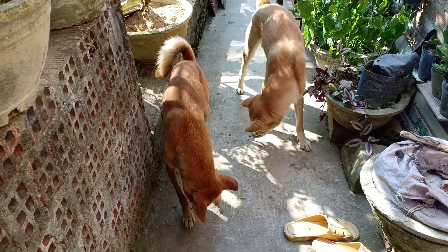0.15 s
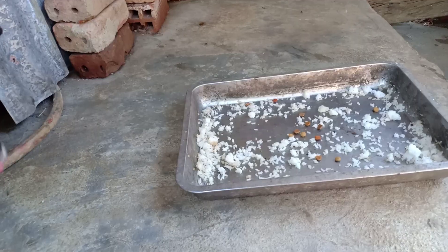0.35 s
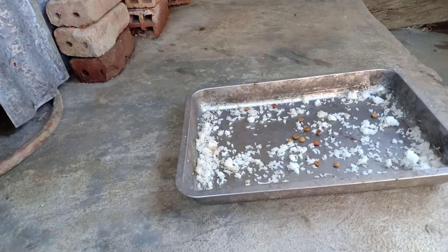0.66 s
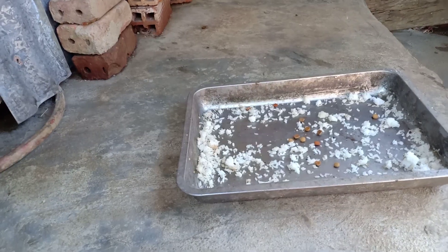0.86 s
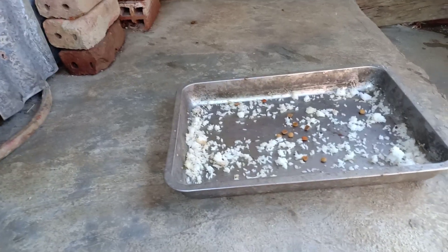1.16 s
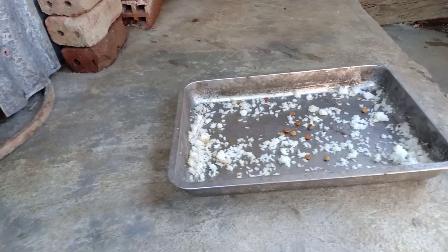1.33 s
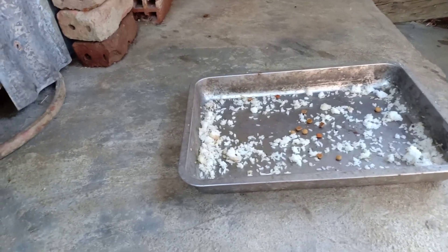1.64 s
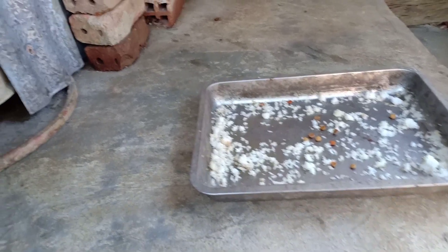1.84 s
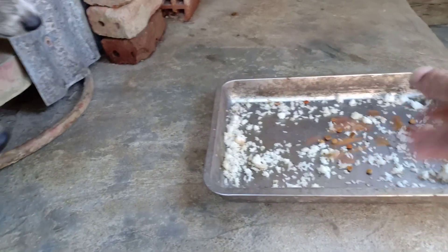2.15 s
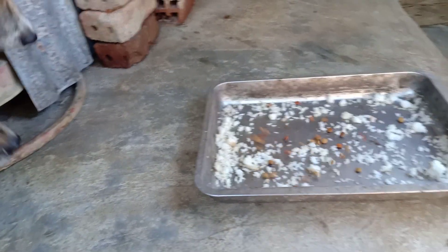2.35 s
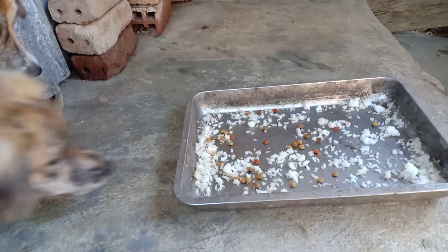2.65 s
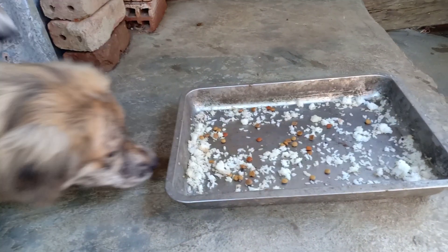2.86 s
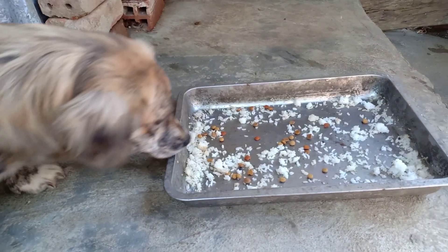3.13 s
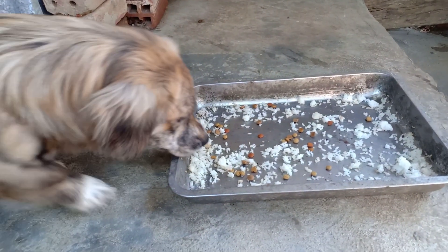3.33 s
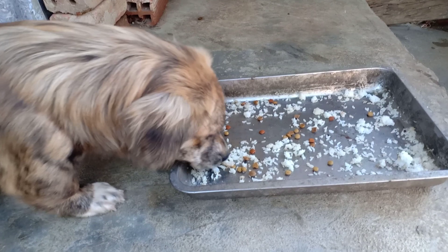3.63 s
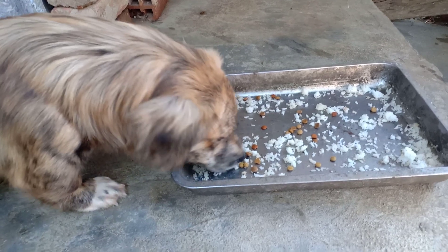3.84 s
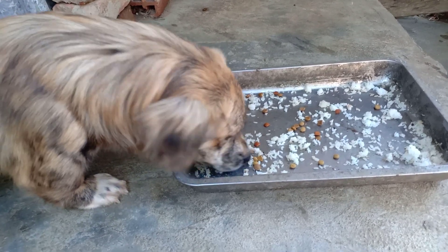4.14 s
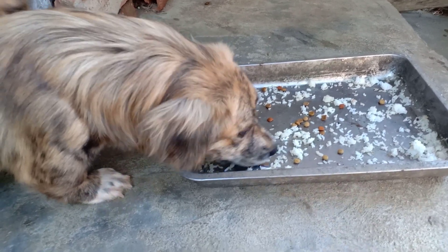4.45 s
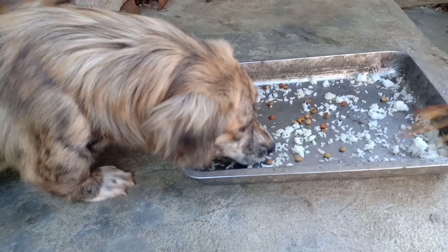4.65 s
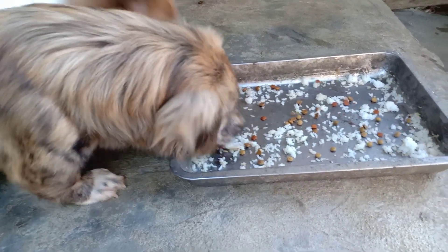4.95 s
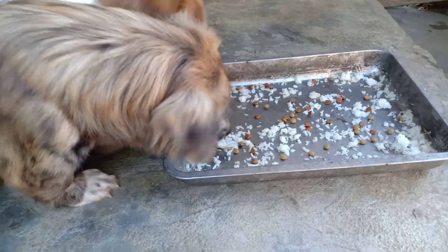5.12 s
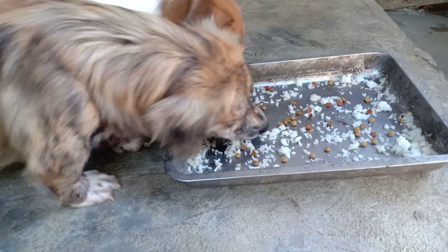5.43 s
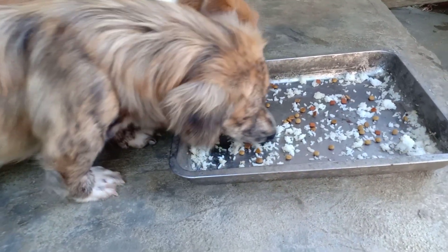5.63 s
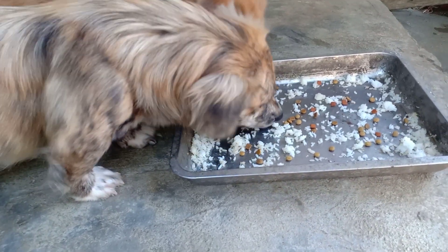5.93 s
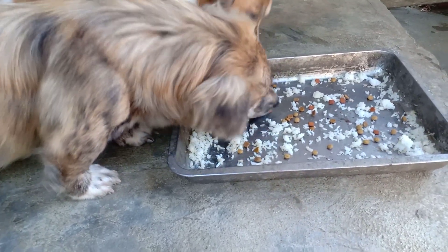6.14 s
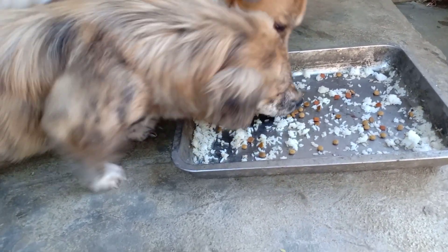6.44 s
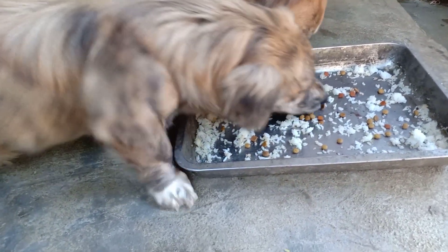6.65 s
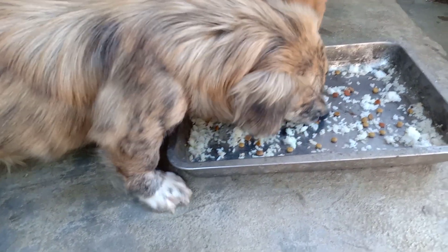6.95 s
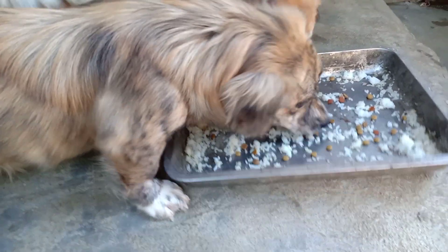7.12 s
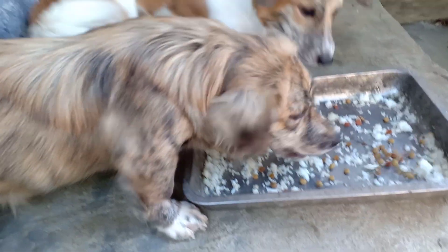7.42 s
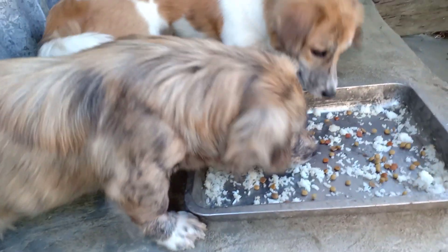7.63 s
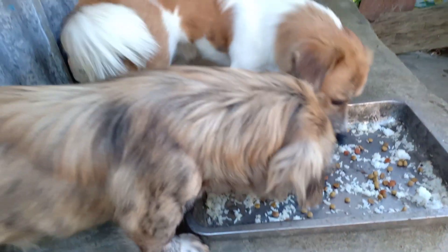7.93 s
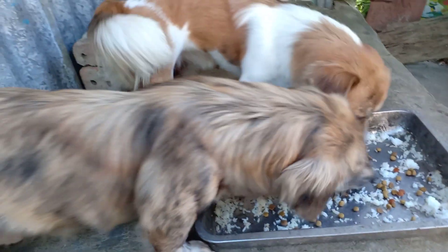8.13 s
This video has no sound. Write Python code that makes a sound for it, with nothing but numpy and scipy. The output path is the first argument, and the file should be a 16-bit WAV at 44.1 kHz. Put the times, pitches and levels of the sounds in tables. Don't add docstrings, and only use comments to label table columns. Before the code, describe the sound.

A brief soft outdoor wash with a faint lick cuts to silence, then a closer yard scene. A hand grinds through dry kibble in a sack and throws three handfuls into a sheet-metal tray, each a sharp, dense clatter with bouncing, rolling pellets. Between throws, claws click on concrete, dogs sniff and nudge the tray, and a bird chirps once. Close stereo pickup, open air, low distant engine hum.

```python
import sys
import numpy as np
from scipy import signal
from scipy.fft import rfft, irfft, next_fast_len
from scipy.io import wavfile
from scipy.ndimage import uniform_filter1d

SR = 44100
rng = np.random.default_rng(int(sys.argv[2]) if len(sys.argv) > 2 else 0)


def store_pcm(level_fs):
    pcm = np.round(np.clip(level_fs, -1, 1) * 32767).astype(np.int16)
    wavfile.write(sys.argv[1], SR, np.atleast_2d(pcm).T)


def linear_from_db(decibels):
    return 10 ** (np.asarray(decibels, float) / 20)


N = 365148


def evened(x):
    return x / np.sqrt(np.mean(x ** 2) + 1e-20)


def read(points, hz):
    f, value = np.transpose(points)
    return np.interp(np.log(hz + 1), np.log(f + 1), value)


def add(mix, s, sound):
    part = mix[..., round(s * SR):][..., :sound.shape[-1]]
    part += sound[..., :part.shape[-1]]


def body(spectrum, lo_hz, hi_hz):
    hz = abs(np.fft.fftfreq(4096, 1 / SR)) + 1
    skirts = np.sqrt((1 + (lo_hz / hz) ** 8) * (1 + (hz / hi_hz) ** 8))
    gain = np.maximum(linear_from_db(read(spectrum, hz)) / skirts, 1e-5)
    phase = -signal.hilbert(np.log(gain)).imag
    taps = np.fft.ifft(gain * np.exp(1j * phase)).real[:1024]
    return taps / np.linalg.norm(taps)


def bands(spectrum, lo_hz):
    edges = [(1400, 3600), (lo_hz, 1400), (3600, 7500), (7500, SR)]
    return [body(spectrum, *e) for e in edges]


def strokes(rows, air_db, air_share, boom_db, boom_share):
    power = np.zeros((4, N))
    for s, db, rise, fall, bright_db, *hold in rows:
        t = np.arange(-rise, sum(hold) + 2 * fall, 1 / SR)
        swell_db = 20 * np.maximum(-t / rise, 0)
        fade_db = 20 * np.maximum((t - sum(hold)) / fall, 0)
        level_db = db - swell_db - fade_db
        parts_db = [[0], [boom_db + boom_share * bright_db], [bright_db], [air_db + air_share * bright_db]]
        onset = np.minimum(4 + 4 * t / rise, 1)
        add(power, s - rise, linear_from_db(2 * level_db) * onset * linear_from_db(2 * np.array(parts_db)))
    return np.sqrt(abs(power))


def grains(per_s, spread_db, t60, wet, lag, clump_db):
    size = linear_from_db(spread_db * np.minimum(rng.exponential(1, N), 3.5)) * (rng.random(N) < per_s / SR)
    size *= linear_from_db(clump_db * evened(uniform_filter1d(rng.standard_normal(N), size=400)))
    size *= rng.choice([-1, 1], N) / np.sqrt(np.mean(size ** 2))
    spots = rng.integers(0, 5, N) == np.arange(5)[:, None]
    t = np.arange(3000) / SR
    wash = rng.standard_normal((len(spots), 2, 3000)) * linear_from_db(-60 * t / t60)
    wash *= wet / np.linalg.norm(wash[0, 0])
    lags = np.round(lag + rng.uniform(-4, 1.9, len(spots))).astype(int)
    for w, late in zip(wash, lags):
        w[[0, 1], [max(late, 0), max(-late, 0)]] += 1
    return wash / np.sqrt(1 + wet ** 2), size * spots


def shaken(curves, bodies, wash, size):
    span = next_fast_len(N + 4096)
    dry = sum(rfft(size * c, span) * rfft(b, span) for c, b in zip(curves, bodies))
    return irfft((dry[:, None] * rfft(wash, span)).sum(0), span)[:, :N]


def ticks(table, parts, boom_db, scatter_t60, ring_db, ring_t60):
    out, t = np.zeros((2, N)), np.arange(4000) / SR
    middle, boom, bright, air = [b / abs(b).max() for b in parts]
    bright = bright + linear_from_db(-10.5) * air
    scatter = rng.standard_normal((len(table), 2, 4001))
    for (s, db, hz, bright_db), chance in zip(table, scatter):
        ping = linear_from_db(db + ring_db) * np.sin(2 * np.pi * hz * t[:1024]) * linear_from_db(-60 * t[:1024] / ring_t60)
        knock = linear_from_db(db) * (0.69 * middle + linear_from_db(boom_db - 6.0) * boom + linear_from_db(bright_db + 6.5) * bright)
        echoes = 0.13 * chance[:, 1:] * linear_from_db(-60 * t / scatter_t60) * np.minimum(t / 0.0025, 1)
        echoes += 0.23 * chance[:, :0:-1] * linear_from_db(-60 * t / 0.0047)
        add(out, s, signal.fftconvolve(echoes, (knock + .35 * ping)[None], axes=1))
        lag = np.clip(np.round(-4 + 3 * chance[0, 0]), -14, 14) / SR
        add(out[0], s + max(lag, 0), 0.97 * (knock + ping))
        add(out[1], s + max(-lag, 0), 1.16 * (knock + ping))
    return signal.sosfilt(signal.butter(2, 180, "high", fs=SR, output="sos"), out)


def flutter():
    return evened(uniform_filter1d(rng.standard_normal((2, N)), size=330))


# (f/Hz, level/dB)
YARD = [(25, -58), (42, -16), (56, -20), (78, -8), (108, -10.5), (250, -8.5), (330, -12.5), (680, -12.5),
        (1040, -17), (2350, -13), (3250, -24.5), (5880, -29.5), (7000, -36), (9570, -42.5), (13600, -36),
        (16000, -52)]
# (f/Hz, likeness from -1 to 1)
SAME = [(60, 1), (180, 0.9), (550, 0.67), (1650, -0.46), (4970, 0.19), (15000, 0.05)]


def yard():
    frames, hz = N // 512 + 5, np.fft.rfftfreq(2048, 1 / SR)
    a, b, c, d, patches = rng.standard_normal((frames, 1025, 5)).T
    patches = evened(uniform_filter1d(uniform_filter1d(patches, 24, 0), 8, 1))
    same = np.clip(read(SAME, hz), -1, 1)[:, None]
    left = a + 1j * b
    z = np.array([left, same * left + np.sqrt(1 - same ** 2) * (c + 1j * d)])
    z *= linear_from_db(read(YARD, hz)[:, None] + 1.5 * patches)
    wash = signal.istft(z, nperseg=2048, noverlap=1536)[1][:, :N]
    return linear_from_db(-53.5) * evened(wash) * linear_from_db([[-1.1], [1.1]])


# (f/Hz, width/Hz, level/dB)
ENGINE = [
    (95.3, 11, -19),
    (112.8, 3.5, 1),
    (142.2, 6, 1),
    (173, 5.2, -6),
]
# (t/s, level/dB)
RUMBLE = [
    (0.0, -66.5),
    (6.04, -54),
    (7.68, -58.5),
    (8.28, -48.5),
]


def engine():
    drive = rng.standard_normal((2, N))
    drive[1] = 0.99 * drive[0] + .25 * drive[1]
    hz = np.fft.rfftfreq(N, 1 / SR)
    shape = sum(linear_from_db(db) / (1 + ((hz - f_hz) / width) ** 2) for f_hz, width, db in ENGINE)
    s, db = np.transpose(RUMBLE)
    swell = linear_from_db(np.interp(np.arange(N) / SR, s, db))
    return evened(irfft(rfft(drive) * shape, N)) * swell * linear_from_db([[-1.2], [1.2]])


# (f/Hz, level/dB per Hz)
TRAY = [(150, -41.5), (250, -36.5), (429, -20.5), (510, -9.5), (748, -9.5), (1020, -2), (1300, -15),
        (1700, -15), (2360, -11.5), (2800, -12.5), (3400, -17), (5730, -2.5), (8400, -17), (13700, -19.5),
        (16000, -26.5)]


def tray_bands():
    return bands(TRAY, 254)


# (peak t/s, level/dB, rise/s per 20 dB, fall/s per 20 dB, brightness/dB)
STIRS = [(.11, -55, .04, .035, -15), (.47, -58, .02, .1, -3), (5.6, -50, .03, .05, -8),
         (5.81, -49, .04, .1, -8), (7.38, -41, .02, .2, -11), (2.08, -60, .1, .9, -5),
         (5.41, -58, .05, .1, 5), (3.345, -31, .04, .06, -2), (4.44, -44, .03, .1, 1),
         (4.51, -35.5, .05, .12, 2.2), (4.68, -50, .2, .15, -5), (5.53, -56, .3, .2, -2),
         (5.657, -43, .03, .1, -4), (5.88, -48, .25, .3, -1), (5.995, -43, .03, .12, -5),
         (6.12, -52, .2, .2, -3), (6.92, -45, .3, .4, -5), (7.1, -46, .3, .12, -8),
         (7.25, -38, .05, .16, -2.5), (7.43, -35, .2, .13, -1), (7.92, -46, .15, .3, 2),
         (8.025, -43, .05, .16, -11), (8.12, -47, .1, .3, -10), (8.205, -44, .04, .6, 2)]


def tray():
    knocks = grains(3000, 3.8, 0.044, 1.2, lag=-1, clump_db=1.6)
    curves = strokes(STIRS + throws(), air_db=-9.7, air_share=1.7, boom_db=-8.7, boom_share=-.9)
    return shaken(curves, tray_bands(), *knocks) * linear_from_db([[-.5], [.5]])


# (t/s, peak level/dB, f/Hz, brightness/dB)
CLAWS = [(0.297, -44, 5970, -25), (0.5043, -44, 6050, 5.5), (0.6893, -47.5, 4700, 3),
         (0.837, -43, 2480, -4), (1.7654, -32, 6100, 3), (2.0193, -35.5, 2700, -12),
         (3.3207, -30, 2540, -5), (4.159, -27, 2700, -3), (4.2236, -21, 2750, -6), (4.4282, -28, 2300, -8),
         (4.4893, -24, 2320, -2.5), (4.6611, -35.5, 2510, -5.5), (6.6958, -18, 2520, -12),
         (6.7695, -26.5, 2600, -7)]


def claws():
    return ticks(CLAWS, tray_bands(), boom_db=-16, scatter_t60=.13, ring_db=-.1, ring_t60=.013)


# (t/s, f/Hz, level/dB, time to fall 60 dB/s)
RINGS = [(.297, 5730, -47, 0.27), (.7, 4880, -54, 0.23), (4.431, 2314, -31, 0.28),
         (4.438, 2680, -30.5, 0.23), (5.976, 1016, -38, 0.15), (7.005, 494, -42, 0.47),
         (7.071, 975, -64, 0.13), (7.092, 499, -32, 0.073), (7.235, 294, -34.5, 0.2),
         (7.233, 530, -33, 0.25), (7.41, 481, -40, 0.1), (6.11, 1800, -48, .2), (4.67, 1780, -48, .15),
         (7.519, 931, -25, 0.14), (7.52, 807, -28.5, 0.29), (8.081, 554, -33, 0.08), (8.11, 520, -40, .1),
         (8.02, 330, -41, .1), (7.5, 320, -43, .15)]


def rings():
    out = np.zeros(N)
    phase, level = flutter()
    turns = np.exp(1j * .8 * phase) * (1 + .35 * level)
    for s, hz, db, t60 in RINGS:
        t = np.arange(0, t60, 1 / SR)
        ring = np.exp(2j * np.pi * hz * t) * turns[round(hz * 10):][:len(t)]
        add(out, s, linear_from_db(db - 60 * t / t60) * np.minimum(t / 0.001, 1) * ring.imag)
    return out


# (f/Hz, level/dB per Hz)
SACK = [(350, -31), (600, -12.5), (1040, -20), (1100, -10), (1310, -11.5), (1410, -16), (2610, -3.5),
        (3390, -14.5), (4340, -7), (5400, -0.5), (9760, -25), (13800, -24), (16000, -17)]


def sack_bands():
    return bands(SACK, 720)


# (peak t/s, level/dB, rise/s per 20 dB,
# fall/s per 20 dB, brightness/dB, hold/s if any)
SCOOPS = [(.42, -58, .04, .06, -9), (1.015, -52.5, .04, .3, -14), (1.3, -30, .05, .3, 1.5),
          (1.42, -21.5, .12, .06, -4), (1.56, -39, .12, .1, -4), (2.16, -62, .15, .3, 12),
          (3.24, -41, .04, .25, -6, .04), (3.46, -46, .06, .15, -3), (3.54, -46, .15, .15, -2),
          (3.66, -44, .12, .15, 2), (3.85, -29, .13, .1, -3.5), (4.02, -35.5, .3, .3, -3),
          (4.165, -34, .025, .06, 3), (4.25, -38, .06, .16, 1), (6.18, -39.5, .03, .9, 4),
          (6.33, -37, .2, .3, -3), (6.41, -30, .22, .04, -3), (6.52, -37, .1, .2, -4),
          (6.635, -37, .03, .22, -4.5), (6.73, -45, .15, .1, -8)]


def sack():
    knocks = grains(1200, 3.1, 0.1, 1.15, lag=0.5, clump_db=2.2)
    curves = strokes(SCOOPS, air_db=-13, air_share=1.7, boom_db=-23, boom_share=0)
    return shaken(curves, sack_bands(), *knocks) * linear_from_db([[-.1], [-.9]])


# (t/s, length/s, start f/Hz, end f/Hz, level/dB)
SNIFFS = [
    (2.885, .065, 14700, 13200, -63),
    (2.89, .12, 12900, 11000, -66),
    (2.99, .1, 15900, 12700, -64),
    (2.93, .09, 5300, 4900, -65),
    (1.19, .06, 12400, 15200, -63),
    (5.93, .08, 13200, 15500, -64),
    (7.11, .08, 7300, 7900, -65),
]


def whistles():
    out = np.zeros(N)
    for s, length, from_hz, to_hz, db in SNIFFS:
        hz = np.linspace(from_hz, to_hz, round(length * SR))
        tone = np.sin(2 * np.pi * np.cumsum(hz) / SR)
        add(out, s, linear_from_db(db) * signal.windows.tukey(len(hz), .5) * tone)
    return out


# (t/s, peak level/dB, f/Hz, brightness/dB)
SNAPS = [(1.233, -39, 2470, -13.5), (1.2645, -31.5, 2450, -7.5), (1.3074, -27, 2700, -2),
         (1.3337, -23.5, 2770, -3), (1.394, -29, 2810, -14), (1.442, -19, 2760, -1),
         (1.5045, -33, 2770, -6), (1.5218, -30, 2740, 1.5), (1.5463, -30, 2800, -3), (1.6133, -33, 5200, 1),
         (1.6334, -34, 4300, -4), (3.2598, -33, 2710, -13), (3.8798, -23, 2550, -1.5),
         (3.9531, -25, 2610, -36), (3.9826, -26, 2670, -33), (3.9956, -22, 2660, -30),
         (4.0347, -24, 2630, -11), (4.1805, -19, 2680, -11), (4.2716, -30, 2700, -10),
         (4.2818, -27, 2740, -5), (6.2566, -27, 2720, -3), (6.285, -26, 2280, -26), (6.335, -27, 2320, -12),
         (6.3828, -25, 2300, -8), (6.4011, -26, 2200, -16), (6.414, -23, 2510, -26),
         (6.469, -21, 2320, -22), (6.541, -27.5, 2360, -10), (6.6283, -18, 2550, -18),
         (6.673, -26, 2770, -21)]


def snaps():
    return ticks(SNAPS, sack_bands(), boom_db=-30, scatter_t60=.07, ring_db=-2.2, ring_t60=.017)


# (t/s, peak level/dB, f/Hz, brightness/dB)
CRACKLES = [(1.2861, -29, 2580, -15), (1.3255, -25, 2840, -17), (1.3474, -26, 2760, -19),
            (1.3694, -22, 2730, -10), (1.3792, -21, 2630, -10), (1.4124, -22, 2520, -17),
            (1.487, -30, 2610, -27), (3.3495, -26, 2090, -15), (3.3586, -28, 2110, -15),
            (3.7916, -30, 2670, -16), (3.8163, -28, 2760, -22), (3.8444, -24, 2840, -24),
            (3.8658, -22, 2610, -21), (3.9338, -29, 2300, -15), (3.9465, -28, 2800, -27),
            (4.012, -26, 2610, -26), (4.3026, -33, 2580, -23), (4.3213, -37, 2630, -21),
            (6.2982, -29, 2690, -21), (6.3446, -24, 2630, -23), (6.3687, -26, 2670, -25),
            (6.3929, -24, 2280, -29), (6.4256, -27, 1960, -20), (6.4402, -31, 2260, -21),
            (6.5046, -28, 2560, -22), (6.5274, -27, 2500, -21), (6.5571, -32, 2710, -22),
            (6.585, -31, 2650, -28), (6.6221, -32, 2580, -29), (6.6548, -29, 2670, -26),
            (6.7043, -25, 2580, -27), (6.7156, -30, 2500, -25), (6.7285, -30, 2670, -17)]


def crackles():
    return ticks(CRACKLES, sack_bands(), boom_db=-30, scatter_t60=.06, ring_db=-.8, ring_t60=.017)


# (middle t/s, level/dB, fade/s per 20 dB)
PUFFS = [
    (2.22, -71, .3),
    (2.9, -63, .35),
    (3.58, -61, .45),
    (4.36, -67, .15),
    (6.07, -65, .25),
]


def puffs():
    rows = [(s, db, fade, fade, 0) for s, db, fade in PUFFS]
    flow = strokes(rows, 0, 0, 0, 0)[0]
    return signal.oaconvolve(rng.standard_normal((2, N)) * flow, tray_bands()[3][None], axes=1)[:, :N]


# (t/s, shower level/dB, landing lasts/s, rebound after/s, rolling fall/s per 20 dB)
THROWS = [
    (2.357, -18, .055, .163, .25),
    (4.801, -18, .045, .13, .3),
    (7.521, -15.5, .016, .12, .2),
]


def throws():
    landings = [(s, db, .006, .056, 2.6, hold) for s, db, hold, _, _ in THROWS]
    rebounds = [(s + late, min(db, -17) - 12, .1, roll, .3) for s, db, _, late, roll in THROWS]
    return landings + rebounds


# (t/s, peak level/dB, f/Hz, brightness/dB)
BOUNCES = [(2.3512, -16, 2260, 0.5), (2.4088, -14, 5730, 1), (2.5194, -13, 5430, -6),
           (2.614, -28, 2290, -19.5), (2.6548, -28, 2220, -17.5), (2.6918, -22.5, 2140, -14),
           (2.7683, -30, 2330, -4), (2.8325, -34.5, 1580, -15), (4.7976, -14, 2460, 1),
           (4.8184, -17, 1980, -5), (4.8441, -9, 6150, -16), (4.9252, -19.5, 5520, -9),
           (4.9725, -14, 5540, -4), (5.0775, -26.5, 2300, -4), (5.1245, -34.5, 2700, 0.5),
           (5.2428, -32.5, 2730, -6), (5.317, -49.5, 2660, 7.5), (7.513, -16, 2500, -2),
           (7.5915, -18, 1930, -19), (7.6323, -20, 2520, 0), (7.6445, -15.5, 2070, -9),
           (7.7225, -17.5, 2330, -5), (7.7615, -19.5, 2270, -6.5)]


def bounces():
    return ticks(BOUNCES, tray_bands(), boom_db=-13, scatter_t60=.14, ring_db=-2, ring_t60=.011)


# (t/s, peak level/dB, f/Hz, brightness/dB)
HOPS = [(2.3622, -10, 1830, -4), (2.3847, -12, 2370, -12), (2.483, -23, 5560, -7), (2.4902, -26, 2330, -13),
        (2.5034, -27, 1140, -8), (2.5588, -23, 2020, -13), (2.5727, -24, 1940, -11),
        (2.5809, -25, 5920, -3), (2.6285, -30, 2350, -15), (2.7134, -35, 1010, -14),
        (2.7246, -41, 2130, -10), (2.7507, -42, 2070, -14), (2.7972, -40, 990, -11),
        (4.943, -22, 2730, -11), (5.022, -29, 2410, -25), (5.0835, -30, 2020, -9), (5.091, -31, 930, -12),
        (5.1477, -36, 5680, -13), (5.1643, -36, 2000, -14), (5.1791, -41, 900, -17),
        (5.2168, -40, 1080, -19), (5.2377, -39, 2860, -8), (5.2679, -43, 2500, -18),
        (7.3801, -32, 820, -23), (7.3916, -31, 1030, -9), (7.4091, -29, 1490, -16), (7.4353, -28, 900, -19),
        (7.5007, -33, 860, -12), (7.6904, -28, 1980, -16), (7.8117, -37, 950, -10),
        (8.0248, -34, 1360, -15), (8.0316, -39, 1660, -23), (8.136, -38, 2370, -21),
        (8.1813, -41, 950, -24), (8.2081, -36, 1140, -3), (8.2168, -37, 2500, -11), (8.2563, -38, 2480, -4)]


def hops():
    return ticks(HOPS, tray_bands(), boom_db=-10, scatter_t60=.08, ring_db=-1.5, ring_t60=.014)


# (t/s, peak level/dB, f/Hz, brightness/dB)
NUDGES = [(5.6501, -40, 2020, -10), (5.8373, -29.5, 1960, -11.5), (5.9016, -35, 2100, -10),
          (5.9765, -23, 2190, -20), (7.0058, -17.5, 2430, -16), (7.0325, -23.5, 2300, -19),
          (7.0404, -29.5, 2240, -7), (7.0706, -21.5, 2230, -24), (7.093, -24.5, 1500, -21),
          (7.1227, -30.5, 1000, -9.5), (7.2028, -20, 1770, -27), (7.234, -25, 1900, -10),
          (7.3731, -24, 1870, -12), (7.4047, -27, 900, -8), (7.421, -39, 5500, 4),
          (7.879, -29, 2110, -21.5), (7.975, -37, 1200, -12), (7.9029, -36, 2600, 2),
          (8.0077, -34, 1630, -8), (8.083, -33, 700, -20), (8.1125, -29.5, 2380, -10)]


def nudges():
    return ticks(NUDGES, tray_bands(), boom_db=-2.5, scatter_t60=.07, ring_db=.5, ring_t60=.012)


# (t/s, f/Hz, level/dB)
BIRD = [
    (6.785, 6900, -52),
    (6.84, 6780, -49),
    (6.872, 6840, -36.5),
    (6.91, 6800, -46),
    (6.94, 6780, -58),
]


def bird():
    out = np.zeros(N)
    s, hz, db = np.transpose(BIRD)
    t = np.arange(s[0], s[-1], 1 / SR)
    phase, level = flutter()[:, :len(t)]
    turn = 2 * np.pi * np.cumsum(np.interp(t, s, hz)) / SR + .5 * phase
    chirp = np.sqrt(2) * (np.sin(turn) + linear_from_db(-21) * np.sin(2 * turn))
    add(out, s[0], linear_from_db(np.interp(t, s, db) + 2 * level) * chirp * signal.windows.tukey(len(t), .1))
    return out


def scene():
    far = yard() + engine()
    near = tray() + claws() + sack() + snaps() + crackles() + bounces() + hops() + nudges()
    apart = signal.lfilter(*signal.butter(1, 800, fs=SR), near[0] - near[1]) / 2
    near = near + .55 * apart * [[-1], [1]]
    tones = rings() + whistles() + bird()
    return far + near + np.array([tones, np.roll(tones, 1)]) + puffs()


def band_limit(x):
    return signal.sosfilt(signal.butter(12, 16450, fs=SR, output="sos"), x)


# (f/Hz, level/dB)
MIC = [(3000, -.3), (4600, .8), (6000, -.3), (6650, -3), (8300, 3), (9650, -3.5), (11000, .6), (15000, .3)]


def record(dry):
    t = np.arange(N) / SR
    hz = np.linspace(0, SR / 2, num=257)
    colour = signal.firwin2(255, hz, linear_from_db(read(MIC, hz)) * (hz < 15950), fs=SR)
    heard = signal.oaconvolve(dry, colour[None], "same")
    second_shot = t > .2624
    shots = np.where(t < .143, linear_from_db(-5.0), second_shot)
    return band_limit(heard * shots + .001 * second_shot)


dry = scene()
out = record(dry)
store_pcm(out)
```